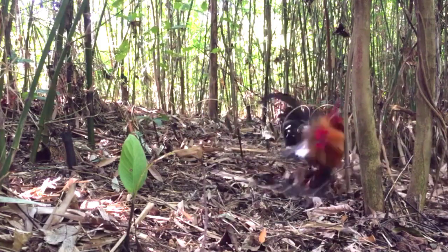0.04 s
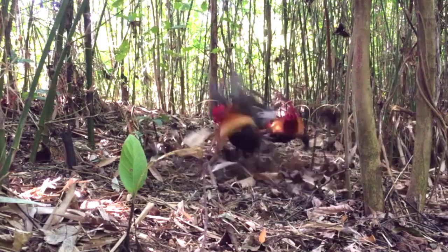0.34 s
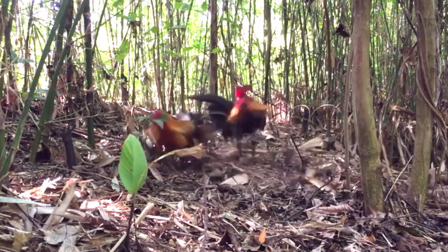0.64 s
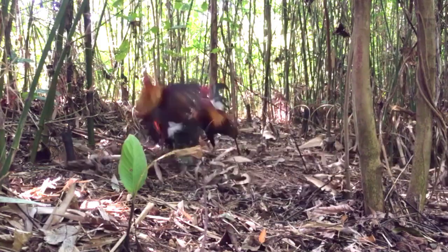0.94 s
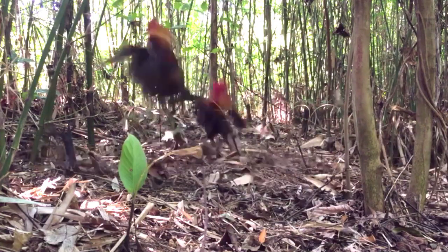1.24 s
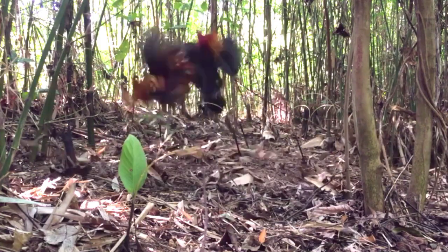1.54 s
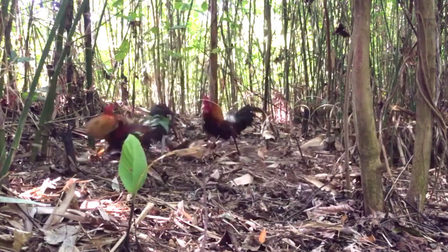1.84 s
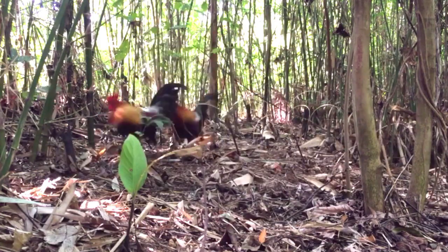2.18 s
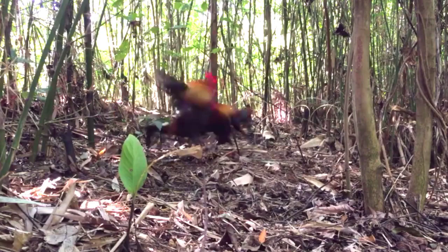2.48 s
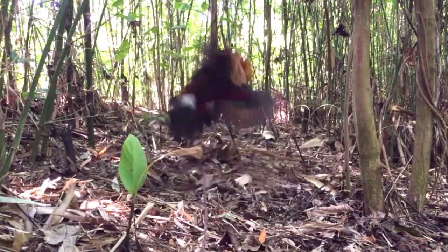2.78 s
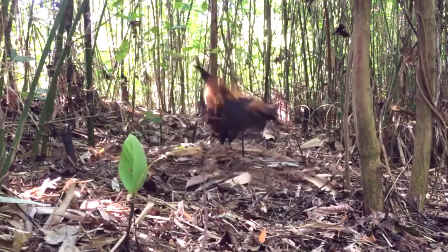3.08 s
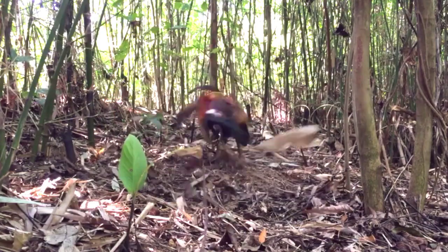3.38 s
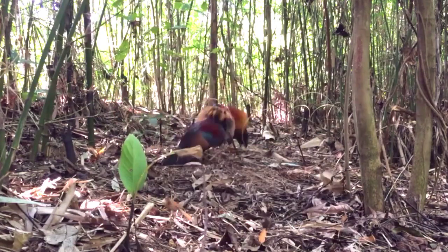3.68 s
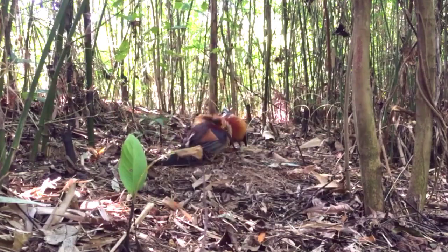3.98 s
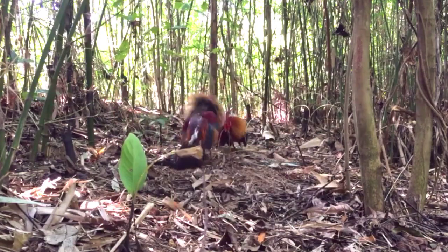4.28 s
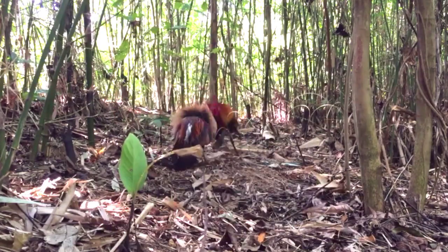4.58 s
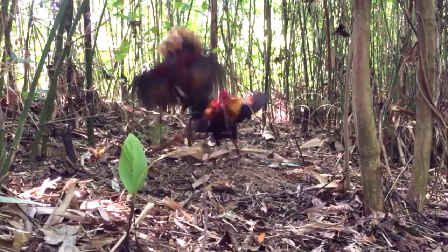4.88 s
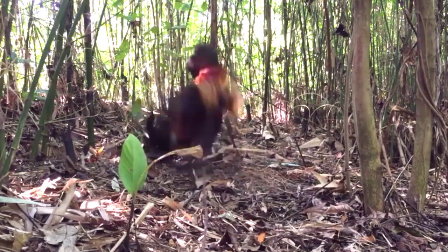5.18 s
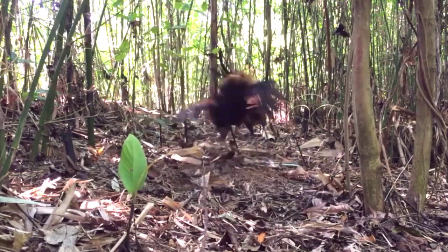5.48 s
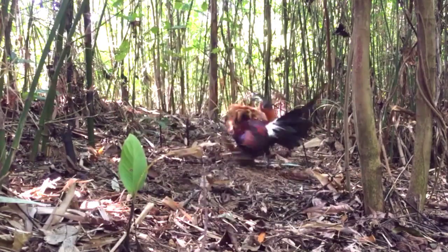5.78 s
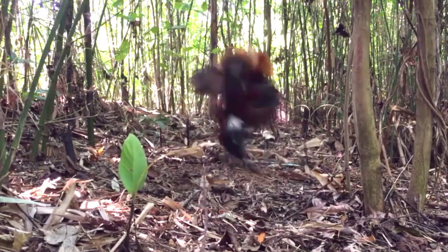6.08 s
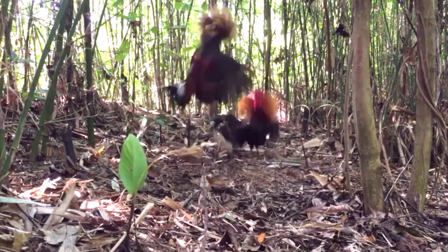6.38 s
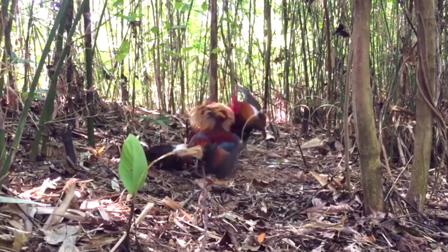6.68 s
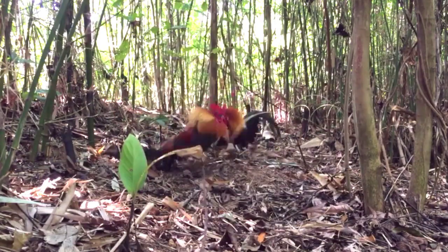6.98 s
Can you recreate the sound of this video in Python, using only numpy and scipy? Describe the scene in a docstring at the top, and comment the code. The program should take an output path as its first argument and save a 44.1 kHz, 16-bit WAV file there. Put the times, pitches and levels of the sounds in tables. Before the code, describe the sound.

Low wingbeats, feathery swishes and sharp slaps mix with crunching leaves and knocking twigs as two junglefowl fight on a forest floor. A long opening bout and a second burst give way to near quiet, where a distant bird barely chirps twice. Brief scuffles follow, building to the hardest smack before fading to light rustling. The fight is heard clearly, with a faint echo among bamboo stems.

```python
"""Two junglefowl cocks spar on dry leaf litter in a bamboo thicket, whose stems scatter a faint echo.
For two seconds wings puff low and swish, wings and feet smack, and kicked leaves crackle. The fight
eases, then flares again around 3 s. In the lull that follows, a thin far chirp sounds twice over the
quiet forest. Short flurries return near 5 s, a hard blow lands at 6.3 s, and the scuffling dies down."""
import sys
import numpy as np
from scipy import signal
from scipy.fft import rfft, irfft, next_fast_len
from scipy.io import wavfile
from scipy.ndimage import uniform_filter1d, map_coordinates

SR = 44100
rng = np.random.default_rng(int(sys.argv[2]) if len(sys.argv) > 2 else 0)


def dump_mix(stems):
    """Bounce the given channels to the path in sys.argv[1] as a 16-bit WAV at rate SR."""
    frames = np.atleast_2d(stems).T  # one column per channel
    limited = np.clip(frames, -1, 1)  # hard clip at full scale
    pcm = np.round(limited * 32767).astype(np.int16)
    wavfile.write(sys.argv[1], SR, pcm)


N = 319284

# a wing or foot hits the other bird:
# start_s, smack_db, t60_s, tilt_db_per_octave, colour_hz, colour_db, thump_db, shove_db
BLOWS = [(0.4559, -23.5, 0.059, 1, 1900, -4, -23.5, -23), (0.58, -31, .052, -1.5, 900, 5, -23.5, -47),
         (0.6586, -25.5, 0.05, 2, 1620, 6.5, -36, -52), (0.7988, -31.5, 0.083, 2, 875, 5, -29.5, -36),
         (1.0878, -23.5, 0.06, 5.5, 4300, 7.5, -43, -30), (1.205, -26, 0.037, -0.5, 3380, 3, -40, -32),
         (1.7207, -26, 0.07, 2.5, 880, 8.5, -29.5, -52), (2.9224, -29, 0.04, -2.5, 840, -3, -33, -39),
         (2.97, -20, 0.027, 1, 2060, 7, -28.5, -27.5), (3.0898, -27, 0.03, 4, 1640, 16, -31, -36),
         (3.1118, -23, 0.0077, 1, 1940, 9.5, -43, -50), (3.2508, -22, 0.052, 2.7, 920, 11.5, -24.5, -39),
         (3.353, -34.5, 0.092, -6, 900, -1, -29.5, -48), (5.1891, -23.5, 0.011, -1, 1520, 10, -35, -52),
         (5.396, -34, 0.098, -2.5, 1900, -4, -32, -45), (5.67, -40, 0.024, 0.5, 6740, 13, -40, -60),
         (6.321, -18, 0.029, 2, 1700, 3.5, -25, -20)]
# wing strokes that meet only air: crest_s, level_db, pitch_hz, length_s
WINGBEATS = [(0.015, -37, 261.4, 0.011), (0.077, -33.5, 178, 0.01), (0.141, -37, 215, 0.013),
             (0.425, -27, 238, 0.0031), (0.517, -31, 238, 0.0047), (0.623, -27.5, 202, 0.0049),
             (0.719, -31, 306.4, .008), (0.937, -40, 306, 0.0074), (0.973, -18.5, 295.9, 0.0054),
             (1.078, -26.5, 328, 0.0078), (1.106, -32.5, 284.7, 0.012), (1.163, -31, 264, 0.0047),
             (1.273, -26, 290, 0.011), (1.627, -39.5, 227.5, 0.013), (2.1, -42.5, 341, 0.0061),
             (2.588, -41.5, 289.8, .007), (2.618, -50.5, 112.7, 0.018), (2.867, -35.5, 244.7, 0.01),
             (2.912, -32.5, 185, 0.014), (2.955, -27, 177, 0.0037), (3.046, -25.5, 322, .007),
             (3.069, -31.5, 165.8, .005), (3.17, -41.5, 293, .008), (4.838, -48.5, 285.5, 0.0061),
             (4.949, -45.5, 169.4, 0.0078), (5.256, -45, 205, 0.0033), (6.226, -31.5, 295, 0.0044),
             (6.257, -32, 286, 0.0056), (6.297, -40, 138, 0.0058), (6.381, -38.5, 175, 0.011),
             (6.456, -48, 133.7, 0.011)]
# the low rumble of churned air: frequency_hz, level_db
AIR_SPECTRUM = [(20, -34), (45, 2), (70, 2), (150, -2.5), (310, -0.5), (420, -12.5), (800, -21.5),
                (2000, -37)]


def contacts():
    """Birds smack against each other, kicked twigs knock at their own pitch, and dry leaves snap."""
    # start_s, level_db, colour_hz, colour_db, t60_s
    twig_knocks = [(0.1248, -39, 2930, 15, 0.016), (0.556, -30.5, 1230, 17, 0.053),
                   (1.4037, -37, 1520, 13, .045), (1.4887, -44, 1540, 11, 0.056),
                   (1.572, -40.5, 1460, 18, 0.027), (1.6221, -31, 1960, 14, .012),
                   (1.661, -35, 1480, 17, 0.056), (2.12, -54.5, 2140, 34, .03), (2.2617, -57, 2880, 7, .05),
                   (2.446, -43.5, 900, 13, 0.037), (3.2414, -32, 1720, 13, 0.012),
                   (3.335, -36, 1800, 11, 0.03), (3.7627, -46.5, 1210, 17.5, .03),
                   (3.9388, -52, 2970, 12, 0.04), (5.09, -39, 1030, 13, .036),
                   (5.6947, -44, 2900, 12, 0.019), (6.1858, -39.5, 1690, 9, 0.064),
                   (6.2586, -31, 1400, 8, 0.029), (6.2774, -37.5, 2000, 4, .03),
                   (6.359, -33, 1440, 8, .024), (6.5341, -54, 1160, 14, 0.049),
                   (6.7486, -44, 2240, 11, 0.079), (7.2233, -57, 2960, 9, .04)]
    # start_s, level_db, tilt_db_per_octave
    leaf_snaps = [(0.071, -46.5, 11), (0.3757, -41.5, 1), (1.0108, -32.5, 1.5), (1.318, -33, -0.5),
                  (1.4225, -34, 2.5), (1.5475, -37.5, 1.5), (1.723, -36.5, 8.5), (1.737, -35, 9),
                  (1.886, -38.5, 10), (2.028, -46, 18), (2.4695, -43.5, 5), (2.699, -51, 23),
                  (2.982, -50, -2), (3.08, -33.5, -1), (3.158, -39, 4), (3.6116, -49, 3), (3.743, -55, 2),
                  (4.002, -58, -2), (4.165, -62, 10), (5.0188, -44.5, 0), (5.038, -45.5, 7),
                  (5.954, -59, 7), (5.388, -43, 3), (6.1162, -50.5, 3.5), (6.1227, -55.5, 8.5),
                  (6.1762, -47, -2), (6.1845, -49, 2), (6.1946, -34, 7.5), (6.6486, -53.5, 3),
                  (7.008, -60.5, -2.5), (7.097, -59.5, 4)]
    out = np.zeros(N)
    for s, db, t60, tilt, hz, colour_db, _, _ in BLOWS:
        add(out, s, amp(db) * smack(t60, tilt, hz, colour_db))
    for s, db, hz, colour_db, t60 in twig_knocks:
        add(out, s, amp(db) * smack(t60, tilt=0.17, colour_hz=hz, colour_db=colour_db))
    for s, db, tilt in leaf_snaps:
        add(out, s, amp(db) * smack(t60=0.094, tilt=tilt, colour_hz=3770, colour_db=0))
    return out


def smack(t60, tilt, colour_hz, colour_db, snap_t60=0.0077, snap_db=5):
    """A sharp snap, then a short splatter as the rest lands; a peak or dip colours the smack."""
    # frequency_hz, level_db
    smack_spectrum = [(60, -26), (200, -8), (400, 0), (800, -5.5), (1400, -5), (2100, -3), (2900, -7.5),
                      (4500, -9.5), (9000, -15), (11000, -19.5), (16000, -21.5)]
    t = np.arange(SR // 10) / SR
    force = amp(snap_db - 60 * t / snap_t60) + amp(-60 * t / t60)
    crack = coloured(force * grit(len(t), spread_db=5.5), smack_spectrum, tilt, colour_hz, colour_db)
    return crack / crack[t < .003].std()  # the attack sets the level


def shoves():
    """Air pushed by wingbeats and blows, as rows of crest_s, level_db, pitch_hz, length_s."""
    rows = list(WINGBEATS)
    for s, *_, thump_db, shove_db in BLOWS:
        rows.append((s + 0.00536, thump_db, 194.3, 0.0042))  # the body thumps just after the smack
        rows.append((s + 0.015, shove_db, 91.8, 0.0072))  # air squeezed out between the birds
    return rows


def puffs(glide=0.0787, push_db=-2, eddy_db=-9, eddy_stretch=1.94, flutter=0.18, flutter_s=0.0042):
    """Each shove of air swells for a few low, uneven cycles, wrapped in rough eddies near its pitch."""
    out = np.zeros(N)
    t = np.arange(-SR // 14, SR // 14) / SR
    for s, db, hz, length in shoves():
        progress = t / length
        # the flexing vane makes each cycle differ; the pitch sags as the wing slows
        flex = map_coordinates(rng.standard_normal(256), [(t - t[0]) / flutter_s], mode="wrap")
        cycles = np.cumsum(hz * (1 + flutter * flex - glide * np.tanh(progress))) / SR
        push = np.sin(2 * np.pi * (cycles + rng.random())) / np.cosh(2 * progress)
        # the eddies outlast the push
        life = 1 / np.cosh(2 * progress / eddy_stretch)
        swirl = coloured(rng.standard_normal(len(t)), AIR_SPECTRUM, colour_hz=hz, colour_db=6)
        eddies = unit(swirl * life) * np.sqrt(np.mean(life ** 2))
        add(out, s + t[0], amp(db) * (amp(push_db) * push + amp(eddy_db) * eddies))
    return out


def swishes(rise_s=0.013, fall_s=0.015, stroke_offset_db=-14, stroke_cap_db=-34, stroke_tilt=-4):
    """Feathers rasp brightly over leaves and dully through air, swelling to mid-stroke, then fading."""
    # wings and tails brush the litter: crest_s, level_db, tilt_db_per_octave
    sweeps = [(0.08, -36, 0), (0.151, -39.5, -1), (0.206, -36.5, 1.5), (0.31, -37, 2), (0.459, -32, -1.5),
              (0.49, -41, 3), (0.589, -31.5, 1.5), (0.695, -37, 3), (0.737, -34.5, 1), (0.802, -32, 1),
              (0.932, -34.5, 0.5), (1.096, -43, -5), (1.129, -39, 2.5), (1.224, -30, 1), (1.594, -34.5, 0),
              (1.769, -38, 1.5), (1.808, -35, 2.5), (2.102, -52, 2), (2.458, -46, 1.5), (2.585, -47, 1.5),
              (2.617, -47.5, 0.5), (2.735, -51.5, 1.5), (2.825, -42.5, -1), (2.927, -30, 0.5),
              (3.037, -45.5, -2), (4.345, -66, 1), (4.705, -65, 2), (4.902, -48, 1), (5.198, -47.5, 7),
              (5.251, -49, 3.5), (5.398, -34, 1), (5.668, -47, 5), (6.228, -38, 1.5), (6.26, -43.5, -2.5),
              (6.335, -39, 1), (6.503, -52.5, 2.5)]
    # frequency_hz, level_db
    feather_spectrum = [(150, -8.5), (400, 3), (800, -1.5), (1900, -3), (2800, -7.5), (3800, -5),
                        (6500, -10.5), (9300, -11), (10800, -16), (12500, -13.5), (16000, -14.5)]
    strokes = [(s, min(db + stroke_offset_db, stroke_cap_db), stroke_tilt) for s, db, _, _ in WINGBEATS]
    out = np.zeros(N)
    t = np.arange(-SR // 20, SR // 7) / SR
    speed = np.exp(np.where(t < 0, t / rise_s, -t / fall_s))
    for s, db, tilt in sweeps + strokes:
        rasp = unit(coloured(grit(len(t), spread_db=1.5), feather_spectrum, tilt))
        add(out, s + t[0], amp(db) * speed * rasp)
    return patchy(out, depth_db=3.5)


def scuffle(crackle_db=-2, slide_db=-6, tick_db=-8, litter_trim_db=-1.5, air_trim_db=-2):
    """Feet slide and crunch the litter in clumps, single leaves tick, and ruffled wings churn the air."""
    # frequency_hz, level_db
    litter_spectrum = [(150, -22), (400, 0.5), (800, 0.5), (1900, 1), (2800, 0), (4200, 1.5), (7000, -1),
                       (9500, 3), (10700, -4), (12500, 2), (16000, 1.5)]
    litter_db, air_db = stirring()
    clicks = crackle(per_second=2600, centre_hz=3690, spread_octaves=1.7, cycles=0.68, size_db=0.5)
    ticks = crackle(per_second=300, centre_hz=4700, spread_octaves=1.71, cycles=1.2, size_db=3.5)
    crunch = amp(crackle_db) * clicks + amp(slide_db) * rng.standard_normal(N) + amp(tick_db) * ticks
    leaves = unit(patchy(coloured(crunch, litter_spectrum), depth_db=2.0))
    churn = unit(coloured(rng.standard_normal(N), AIR_SPECTRUM))
    clumps_db, flutter_db = 2.0 * wobble(70), 2.1 * wobble(45)
    leaves *= amp(litter_db + litter_trim_db + clumps_db)
    churn *= amp(air_db + air_trim_db + flutter_db)
    return leaves + churn


def stirring(idle_db=-82, build_db_per_s=338, litter_fall_db_per_s=135, air_fall_db_per_s=170):
    """Litter and air envelopes in dB: a flurry breaks out, holds and settles, the leaves last."""
    # scrambling feet and ruffled wings: start_s, end_s, litter_db, air_db
    flurries = [(0.0, 0.26, -50, -50), (0.24, 0.3, -46.5, -53), (0.397, 0.73, -44.5, -45),
                (0.80, 0.814, -42, -52), (0.88, 1.02, -44, -46.5), (1.1, 1.147, -41, -42),
                (1.234, 1.358, -43, -43.5), (1.445, 1.506, -52, -54.5), (1.593, 1.784, -48, -46.5),
                (1.85, 1.992, -47.5, -68), (2.10, 2.145, -60.5, -64), (2.34, 2.38, -63.5, -80),
                (2.457, 2.755, -56, -72), (2.854, 3.145, -46, -47.5), (3.255, 3.409, -45.5, -54),
                (3.596, 3.805, -66.5, -80), (4.894, 4.903, -53, -70), (4.946, 5.144, -58.5, -56.5),
                (5.19, 5.287, -55, -56), (5.39, 5.464, -47.5, -50.5), (5.665, 5.754, -58, -74),
                (6.21, 6.294, -47.5, -49.5), (6.512, 6.555, -63, -59.5), (6.69, 6.767, -58, -66),
                (6.99, 7.23, -68.5, -69)]
    t = np.arange(N) / SR
    litter_db, air_db = idle_db, -np.inf  # standing birds still stir the litter faintly
    for start, end, litter, air in flurries:
        build_db = build_db_per_s * np.minimum(t - start, 0)
        after_s = np.maximum(t - end, 0)
        litter_db = np.maximum(litter_db, litter + build_db - litter_fall_db_per_s * after_s)
        air_db = np.maximum(air_db, air + build_db - air_fall_db_per_s * after_s)
    return litter_db, air_db


def crackle(per_second, centre_hz, spread_octaves, cycles, size_db):
    """Dry leaves break in tiny clicks, each ringing for a cycle or two at a pitch of its own."""
    count = int(per_second * N / SR)
    when, pitch, size = rng.random((count, 3)).T
    hz = np.clip(centre_hz * 2 ** (spread_octaves * (2 * pitch - 1)), 300, 15500)[:, None]
    age = np.arange(SR // 300)
    phase = hz * age / SR
    strength = amp(size_db * np.minimum(-np.log(1 - size), 4.5))[:, None]
    grains = strength * np.sin(2 * np.pi * phase) * np.exp(-phase / cycles) * hz / centre_hz
    positions = (when * N).astype(int)[:, None] + age
    return unit(np.bincount(positions.ravel(), grains.ravel(), N)[:N])


def thicket(x, build_s=0.0043, near_db=5, near_t60=0.17):
    """Near stems scatter the sound back at once, far ones for longer, each frequency at its own rate."""
    # frequency_hz, t60_s
    ring_times = [(100, 0.44), (500, 0.06), (2000, 0.21), (6000, 0.33), (15000, 0.44)]
    hz, t, noise = signal.stft(rng.standard_normal(SR), SR, nperseg=256)
    far = amp(-60 * t / along(ring_times, hz)[:, None])
    near = amp(near_db - 60 * t / near_t60)
    onset = 1 - np.exp(-t / build_s)
    tail = signal.istft(noise * (far + near) * onset, SR, nperseg=256)[1]
    return signal.fftconvolve(x, tail / np.linalg.norm(tail))[:N]


def forest(hush_db=-68.0, chirp_hz=6250, waver_hz=120):
    """A bed of still air among the stems, and a far, thin, wavering chirp."""
    # frequency_hz, level_db
    hush_spectrum = [(20, -33), (35, -25), (60, 6), (120, 5), (200, -3), (320, -3.5), (1400, -8),
                     (2800, -11), (7000, -13), (9500, -15), (10700, -19), (16000, -18.5)]
    # crest_s, length_s, level_db
    chirps = [(3.97, 0.24, -73), (4.728, .26, -81)]
    t = np.arange(N) / SR
    hush = amp(hush_db + 0.13 * wobble(3)) * unit(coloured(rng.standard_normal(N), hush_spectrum))
    swell = sum(amp(db) * np.exp(-(2 * (t - s) / length) ** 2) for s, length, db in chirps)
    pitch_hz = chirp_hz + waver_hz * wobble(260)
    return hush + swell * np.sin(2 * np.pi * np.cumsum(pitch_hz) / SR)


def patchy(x, depth_db):
    """Every leaf and feather has its own colour: random gains, several hundred Hz by about 10 ms."""
    spectra = signal.stft(x, nperseg=256)[2]
    patches = uniform_filter1d(rng.standard_normal(spectra.shape), size=4, axis=0)
    patches = uniform_filter1d(patches, size=4, axis=1)
    gains = unit(amp(depth_db * unit(patches)))
    return signal.istft(spectra * gains, nperseg=256)[1][:len(x)]


def coloured(x, spectrum, tilt=0, colour_hz=1000, colour_db=0, width_octaves=0.26):
    """Equalise x with a spectrum, a treble tilt in dB per octave and one peak or dip."""
    size = 2 * next_fast_len(len(x))
    hz = np.fft.rfftfreq(size, 1 / SR)
    octaves = np.log2(np.clip(hz, 900, 11000) / 900)
    bell_db = colour_db / (1 + (np.log2((hz + 1) / colour_hz) / width_octaves) ** 2)
    gain = amp(along(spectrum, hz) + tilt * octaves + bell_db)
    # minimum phase, so nothing rings ahead of an attack
    cepstrum = irfft(np.log(gain))
    cepstrum[1:size // 2] *= 2
    cepstrum[size // 2 + 1:] = 0
    return irfft(rfft(x, size) * np.exp(rfft(cepstrum)))[:len(x)]


def grit(count, spread_db):
    """Noise made of tiny clicks of very uneven size."""
    return rng.standard_normal(count) * amp(spread_db * np.clip(rng.standard_normal(count), -2, 2))


def wobble(rate):
    """A smooth random curve, rate knots a second."""
    knots = rng.standard_normal(int(N * rate / SR) + 4)
    return map_coordinates(knots, [np.arange(N) * rate / SR])


def along(points, hz):
    """A curve through (frequency_hz, value) points, read on a log axis."""
    frequencies, values = np.transpose(points)
    return np.interp(np.log(hz + 1), np.log(frequencies + 1), values)


def amp(db):
    """Decibels to gain."""
    return 10 ** (np.asarray(db) / 20)


def unit(x):
    """Scaled to rms 1."""
    return x / np.sqrt(np.mean(x ** 2) + 1e-20)


def add(track, s, sound):
    """Mix a sound into the track from time s on."""
    start = round(s * SR)
    part = sound[max(-start, 0):max(N - start, 0)]
    track[max(start, 0):][:len(part)] += part


def scene():
    """The fight, its echo among the stems, and the forest behind it, in mono."""
    hits_and_swishes = contacts() + swishes()
    air = puffs()
    echo = amp(-9.0) * thicket(hits_and_swishes + amp(-4.0) * air)  # long waves slip past thin stems
    return (hits_and_swishes + air + scuffle() + echo + forest())[None]


def record(dry, low_cut_hz=40, top_hz=16050):
    """A small microphone loses the deepest bass, and a steep cut takes off the highest treble."""
    size = next_fast_len(N + SR // 4)
    low_cut = signal.butter(2, low_cut_hz, "high", fs=SR, output="sos")
    thinned = signal.sosfilt(low_cut, dry)
    passband = np.fft.rfftfreq(size, 1 / SR) < top_hz
    return irfft(rfft(thinned, size) * passband, size)[:, :N]


dry = scene()
out = record(dry)
dump_mix(out)
```